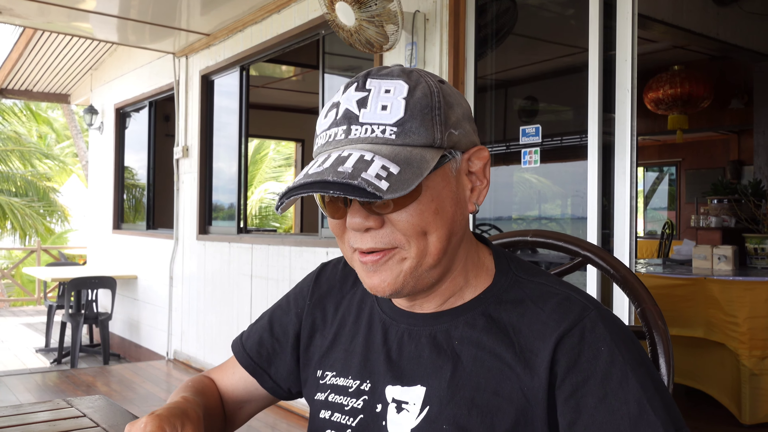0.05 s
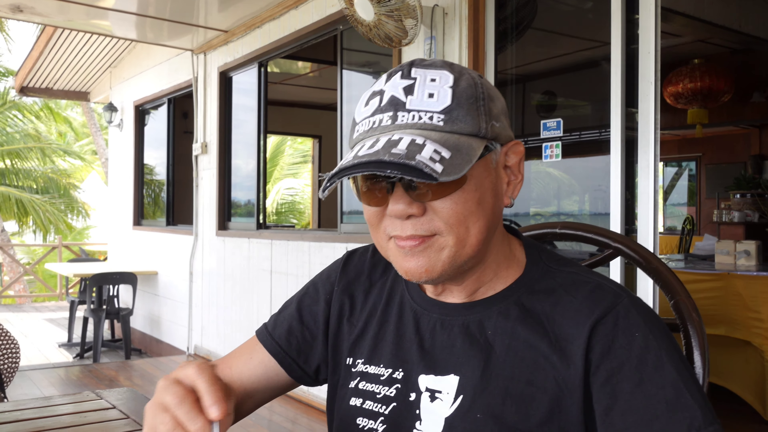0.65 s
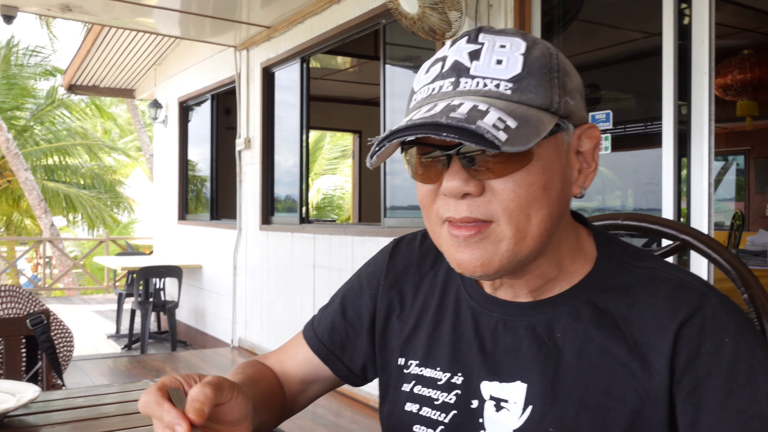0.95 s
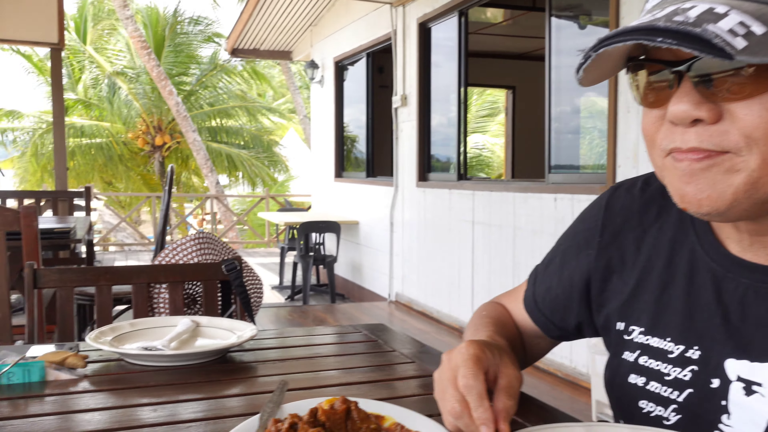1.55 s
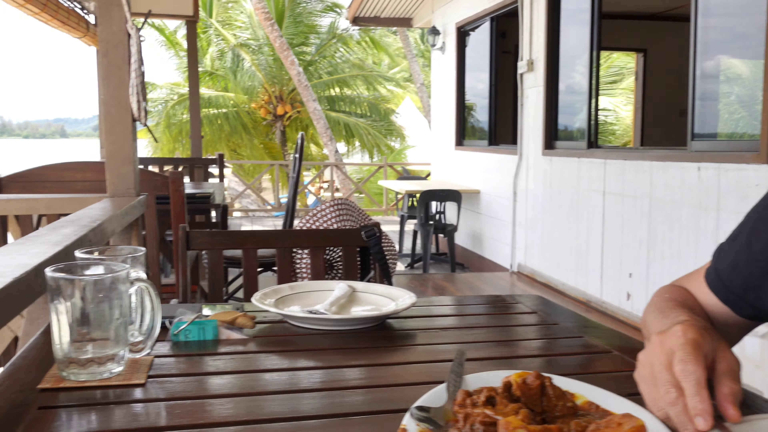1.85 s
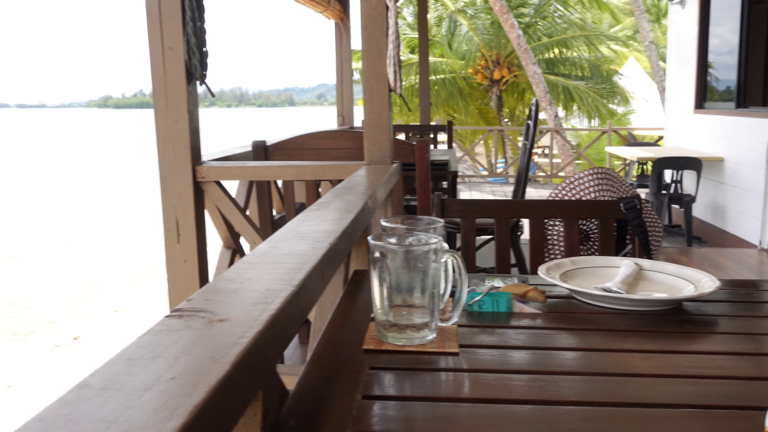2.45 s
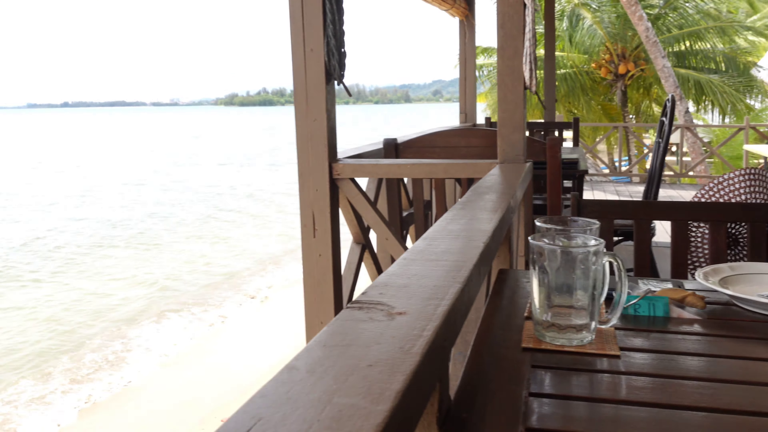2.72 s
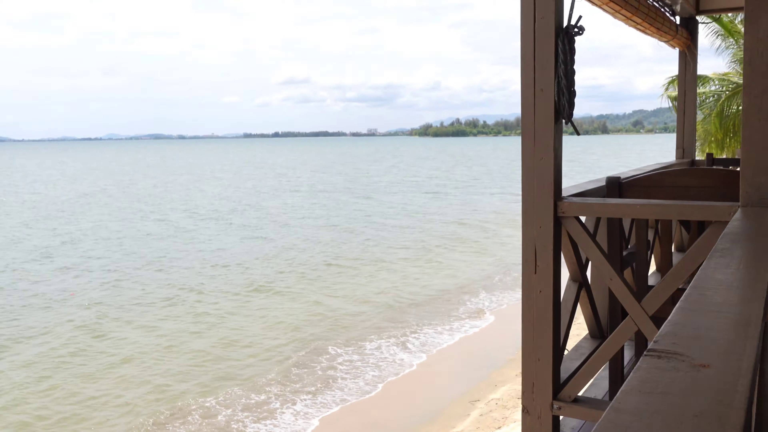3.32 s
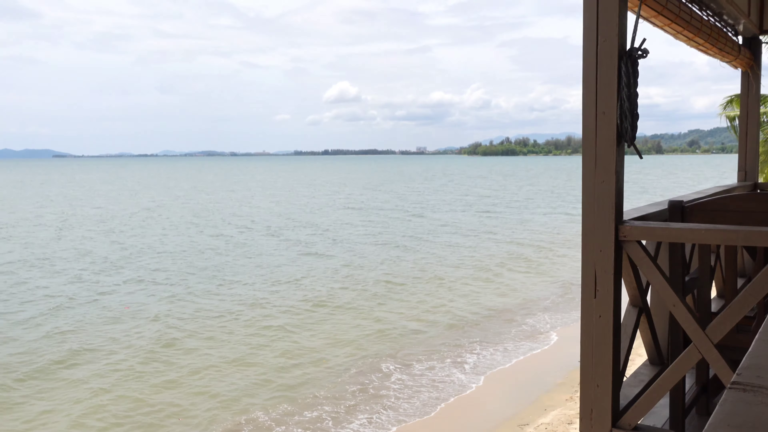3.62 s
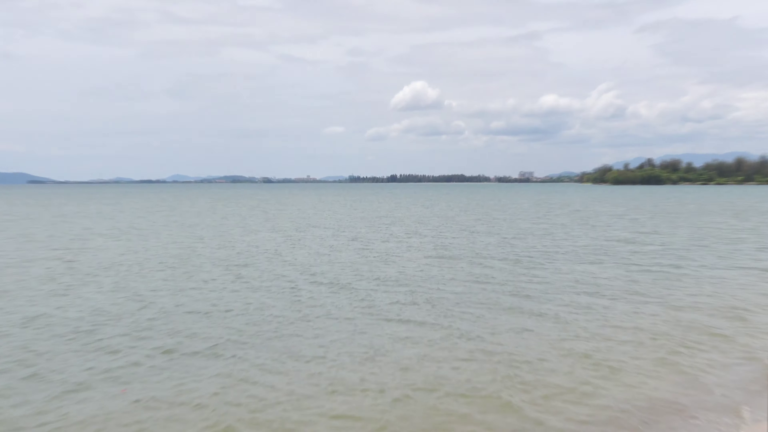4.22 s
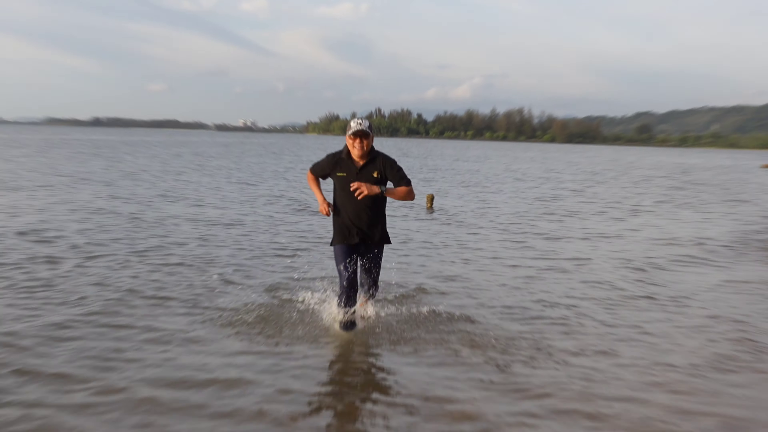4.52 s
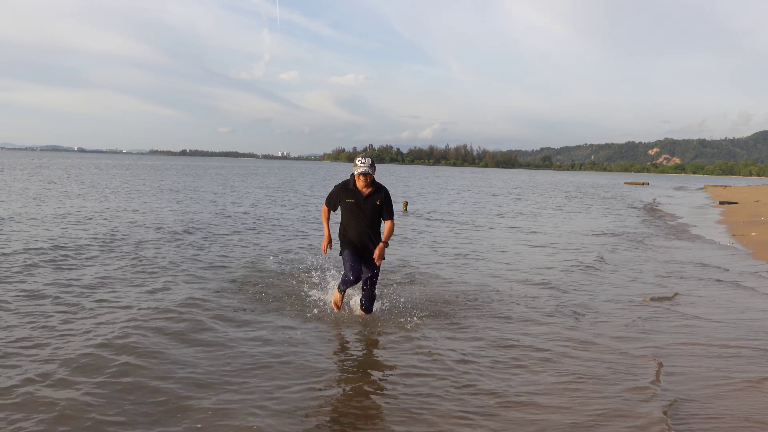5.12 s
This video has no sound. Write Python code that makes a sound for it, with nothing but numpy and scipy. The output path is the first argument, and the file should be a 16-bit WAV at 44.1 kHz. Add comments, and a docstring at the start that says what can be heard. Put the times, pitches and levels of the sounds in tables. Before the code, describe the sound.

Small waves rush onto sand while cutlery clinks on a plate, then someone runs splashing through shallow water.

```python
"""A seaside veranda: small waves break and wash up the sand below, a rush of countless bubbles,
while a spoon and a fork tap a plate and all three ring. The microphone turns from table to sea.
This fades out and the water's edge fades in, where someone runs through the shallows.
Each stride throws up spray, drops tick as they land, and trapped bubbles ring.
A faint rumble of sea and breeze lies under both scenes."""
import sys
import numpy as np
from scipy import signal
from scipy.fft import rfft, irfft, next_fast_len
from scipy.io import wavfile

SR = 44100
rng = np.random.default_rng(int(sys.argv[2]) if len(sys.argv) > 2 else 0)


def to_wav(sig):
    """Store sig (one row per channel, or 1-D mono) as 16-bit WAV at the path in sys.argv[1].

    Samples outside -1..1 are clipped; the rate is SR.
    """
    pcm = np.clip(np.atleast_2d(sig), -1, 1) * 32767
    pcm = np.round(pcm).astype(np.int16)
    wavfile.write(sys.argv[1], SR, pcm.T)  # frames by channels


N = 236876
TIME = np.arange(N) / SR
SCENE_CHANGE_S = 4.425

# waves on the sand: break_s, strength_db, build_db_per_s, retreat_s (to drop the first 10 dB)
WAVES = [(2.029, -29.5, 5, 0.72), (3.245, -38.8, 45, 1.24)]
# little waves that topple along the way: start_s, lift_db
WAVELETS = [(0.02, 5.5), (0.6, 4.5), (1.2, 4), (1.44, 0), (2.08, 1), (3.07, 4), (3.235, 2), (3.48, 3),
            (3.775, 6)]
# the surf's gurgle, wash, hiss and fizz: usual_db, db_per_db_of_swell, wavelet_share, max_fall_db_per_s
SURF_PARTS = [(-53, 1.23, 1.0, 40), (-35, 1.0, 0.46, 30), (-36, 0.98, 0.18, 15), (-45.0, 0.94, 0.087, 10.5)]
# tone of the surf when facing the table, then the sea: pitch_hz, level_db
SURF_FACING_TABLE = [(15, -73), (25, -47), (64, -41.5), (127, -28), (180, -16), (217, -11.5), (301, -6.5),
                     (427, -4.5), (695, 0), (1260, 0), (2000, -2.5), (6050, -12), (11900, -25),
                     (16000, -37.5)]
SURF_FACING_SEA = [(15, -72), (25, -42), (87, -28), (157, -17), (242, -12.5), (451, -6), (489, -4),
                   (887, 1.5), (1020, -1.5), (1480, -1), (2000, -4), (3340, -6), (7510, -17.5),
                   (14800, -32), (16000, -37)]
# how alike left and right are in the surf (1 = the same): pitch_hz, likeness
SURF_LIKENESS = [(60, 0.67), (150, 0.97), (380, 0.98), (950, 0.84), (2380, 0.68), (5980, 0.65),
                 (15000, 0.41)]
# the notes that plate, spoon and fork ring with: pitch_hz, level_db, ring_s (to fade by 60 dB)
PLATE_NOTES = [(1603, -21.5, 0.34), (2325, -7.5, 0.087), (2428, -8.5, 0.092), (2572, 0, 0.03),
               (3668, -5, 0.039), (4980, -4.5, 0.078), (5150, -7.5, 0.044), (8140, -9.5, 0.11),
               (11000, -23, .1)]
SPOON_NOTES = [(1574, -11, 0.37), (2526, -14, 0.09), (3633, -0.5, 0.12), (3700, 4, 0.029),
               (4660, -10, 0.23), (5030, -10, .2), (5940, -17, 0.24), (6113, -15, .14), (6330, -14.5, 0.48),
               (7355, -10, 0.36), (7980, -11, 0.29), (8120, -13, 0.23), (9146, -19.5, .13),
               (9880, -5.5, 0.11), (11770, -17, 0.23), (13150, -21, .16), (13975, -21.5, .17)]
FORK_NOTES = [(3608, -1, 0.061), (3684, -2, 0.11), (5933, 1, 0.12), (6440, -5.5, 0.3), (7600, -14.5, .18),
              (7760, -11.5, .19), (7935, -1, .12), (9540, -9.5, 0.2), (9835, -17, .2), (12100, -17.5, .22),
              (14010, -21, .18)]
# cutlery touching the plate: start_s, plate_db, spoon_db, fork_db, top_hz (higher notes ring weakly)
CLINKS = [(.0942, -30, -52, -56, 3500), (.1082, -27, -31, -35, 4830), (.1396, -21.5, -36, -49, 3400),
          (.150, -25, -55, -48, 5200), (0.1962, -26, -38, -51, 3400), (0.212, -30.5, -52, -55, 6500),
          (1.0877, -28, -16.5, -47, 15500), (1.1215, -21, -25.5, -34, 7000), (1.159, -26, -42, -50, 4500),
          (1.2403, -25, -50, -47, 4000), (1.489, -18, -50, -51, 6500), (1.622, -34, -35, -52, 4000),
          (1.7579, -17, -25, -23, 13500)]
# change from one bounce to the next: plate_db, spoon_db, fork_db
BOUNCE_DB = [-8.5, -7.5, -1.5]
# feet plunging into the water: start_s, level_db, fade_s
STRIDES = [(4.826, -44.5, 0.56), (5.022, -45, 0.15), (5.262, -31, 0.084), (5.279, -33.5, 0.22)]
# gurgle, wash, hiss and fizz of the shallows: lapping_db, churned_db
SHALLOWS_PARTS = [(-70, -58.5), (-51.5, -41.5), (-54, -44), (-63.5, -51)]
# tone of the shallows: pitch_hz, level_db
SHALLOWS_TONE = [(15, -73), (25, -41), (270, -14.5), (317, -14.5), (384, -17), (416, -13), (659, -4),
                 (1370, -3), (3080, -0.5), (8140, -10), (14000, -25.5), (16000, -41)]
# how alike left and right are in the shallows: pitch_hz, likeness
SHALLOWS_LIKENESS = [(60, 0.97), (240, 1), (950, 0.9), (3770, 0.96), (15000, 0.78)]
# the loudest single drops and bubbles: start_s, level_db, pitch_hz, cycles_until_gone
PLOPS = [(3.238, -24, 1390, 42), (3.778, -23.5, 1390, 42), (4.645, -30.5, 773, 24), (4.730, -35.5, 920, 40),
         (4.866, -16, 8900, 15), (4.879, -17, 4370, 18), (4.9539, -13.5, 3050, 11),
         (4.957, -27.5, 1058, 24), (4.9995, -14.5, 3060, 15), (5.175, -6.5, 4970, 9.6),
         (5.263, -14, 3500, 25), (5.2676, -12, 3920, 17), (5.2765, -9.5, 930, 8.8),
         (5.2777, -11.5, 2280, 16), (5.312, -18, 1130, 15), (5.335, -22.5, 1660, 34),
         (5.343, -33, 4050, 190), (5.356, -27, 4320, 300)]
# deep rumble of the open air: time_s, level_db
RUMBLE_LEVELS = [(0, -88), (1.2, -85), (2.6, -75), (3.75, -80), (4.2, -66), (4.6, -92), (5.37, -87)]


def surf(usual_db=-35, turn_s=(2.3, 3.5)):
    """Waves rush and gurgle, deeper when stronger; the tone shifts as the microphone turns to the sea."""
    gurgle = bubbles(per_s=700, cycles=29, low_hz=279.3, high_hz=2022, spread_db=3.5, pitches=24)
    fizzing = rush(SURF_LIKENESS, patchy_db=1.0, flicker_hz=14) + from_db(-16.5) * gurgle
    swell, lift = wave_strength() - usual_db, wavelets()
    levels = [db + follows * foam(swell, fall) + share * lift for db, follows, share, fall in SURF_PARTS]
    turned = np.interp(TIME, turn_s, [0, 1])
    facing_table = water(fizzing, SURF_FACING_TABLE, levels)
    facing_sea = water(fizzing, SURF_FACING_SEA, levels)
    return (1 - turned) * facing_table + turned * facing_sea


def wave_strength(lull_db=-44):
    """Each wave builds, breaks and retreats ever faster into a steady lull; gives dB."""
    power = from_db(lull_db) ** 2
    for break_s, db, build, retreat_s in WAVES:
        building_db = build * np.maximum(break_s - TIME, 0)
        retreating_db = 10 * (np.maximum(TIME - break_s, 0) / retreat_s) ** 2
        power = power + from_db(db - building_db - retreating_db) ** 2
    return 10 * np.log10(power)


def wavelets(topple_s=0.01, settle_s=0.16):
    """Each little wave lifts the surf for a moment as it topples; gives dB."""
    return sum(db * np.clip((TIME - start_s) / topple_s, 0, 1) * np.exp(-abs(TIME - start_s) / settle_s)
               for start_s, db in WAVELETS)


def foam(level_db, db_per_s):
    """Foam goes on bursting behind a wave, so the level falls no faster than the given rate."""
    return np.maximum.accumulate(level_db + db_per_s * TIME) - db_per_s * TIME


def tableware(crack_db=-6, crack_s=0.1, uneven_db=1.2, free_s=0.031, damped_s=0.085):
    """Each touch gives a gritty crack and sets plate, spoon and fork ringing."""
    out, t = np.zeros((2, N)), TIME[:SR // 3]
    notes = np.array(PLATE_NOTES + SPOON_NOTES + FORK_NOTES)
    owner = np.repeat(np.arange(3), [len(PLATE_NOTES), len(SPOON_NOTES), len(FORK_NOTES)])
    hz, note_db, ring_s = notes.T[:, :, None]
    sides = np.array([1, -1])[:, None, None]
    tilt_db, lag = rng.normal(size=(2, len(notes), 1))   # each note spreads left and right its own way
    phase = 2 * np.pi * (hz * t + rng.random((len(notes), 1))) + 0.12 * sides * lag
    rings = from_db(note_db + sides * (tilt_db - 3.0) / 2) * dying(t, ring_s) * np.sin(phase)
    rings *= dying(np.maximum(t - free_s, 0), damped_s)   # the fingers soon touch and stop the ringing
    for start_s, levels, top_hz in touches():
        softness = 1 / np.sqrt(1 + (hz[:, 0] / top_hz) ** 6)   # a glancing touch misses the high notes
        strength = softness * from_db(levels[owner] + uneven_db * rng.normal(size=len(notes)))
        grit = rng.standard_normal(len(t)) + .5 * rng.standard_normal((2, len(t)))
        crack_band_hz = [1800, np.clip(0.62 * top_hz, 2800, 13500)]
        crack = filtered(grit * dying(t, crack_s), 1, crack_band_hz, "band")
        add(out, start_s, strength @ rings + from_db(max(levels) + crack_db) * crack)
    return filtered(out, 4, 1300, "high")   # small things give off no bass


def touches(bounce_s=0.008):
    """The cutlery lands and bounces twice, weaker each time."""
    for start_s, *levels, top_hz in CLINKS:
        gap_s = bounce_s * (1 + .06 * rng.normal())
        for bounce in range(3):
            yield start_s + bounce * gap_s, np.array(levels) + bounce * np.array(BOUNCE_DB), top_hz


def shallows(churn_s=(4.675, 5.01)):
    """A runner churns up lapping water: falling spray patters, and each stride adds a burst of it."""
    drops = bubbles(per_s=1400, cycles=14, low_hz=450, high_hz=13100, spread_db=2.5, pitches=36)
    spray = rush(SHALLOWS_LIKENESS, patchy_db=3.0, flicker_hz=28) + from_db(-5.5) * drops
    levels = [np.interp(TIME, churn_s, part) for part in SHALLOWS_PARTS]
    bursts = sum(from_db(db) * dying(TIME - start_s, fade_s) for start_s, db, fade_s in STRIDES)
    splash = unit_level(shaped(spray, lambda hz: from_db(at_hz(SHALLOWS_TONE, hz))))
    return panned(water(spray, SHALLOWS_TONE, levels) + bursts * splash, left_db=-1.1)


def plops(rise=0.13, tick_db=-14, tick_cycles=8):
    """A drop lands with a tick; the bubble it traps rings and climbs in pitch as it nears the surface."""
    out, t = np.zeros((2, N)), TIME[:SR // 8]
    for start_s, db, hz, cycles in PLOPS:
        life_s = cycles / hz
        phase = 2 * np.pi * hz * t * (1 + .5 * rise * np.minimum(t / life_s, 2))
        bubble = (1 - np.exp(-t * hz)) * dying(t, life_s) * np.sin(phase)
        noise = filtered(rng.standard_normal(len(t)), 2, [.5 * hz, min(2 * hz, 11000)], "band")
        tick = unit_level(noise) * dying(t, tick_cycles / hz)
        plop = from_db(db) * (bubble + from_db(tick_db) * tick)
        add(out, start_s, panned(plop, left_db=1.7 * rng.normal() - 1))
    return filtered(out, 2, [300, 10000], "band")


def water(source, tone, levels_db):
    """Big air pockets gurgle, middling ones wash, small ones hiss and the finest fizz."""
    sound = shaped(source, lambda hz: from_db(at_hz(tone, hz)))
    below = [shaped(sound, lambda hz: 1 / (1 + (hz / edge_hz) ** 6)) for edge_hz in (400, 2000, 6000)]
    parts = np.diff([0 * sound, *below, sound], axis=0)
    return sum(unit_level(part) * from_db(db) for part, db in zip(parts, levels_db))


def bubbles(per_s, cycles, low_hz, high_hz, spread_db, pitches, uneven_db=3.0):
    """Nearby bubbles of uneven size ring briefly; each pitch has its own place from left to right."""
    out = 0
    for hz in np.geomspace(low_hz, high_hz, pitches):
        when, size, sign = rng.random((int(per_s * N / SR / pitches) + 1, 3)).T
        heights = from_db(uneven_db * np.minimum(-np.log(1 - size), 4.5))   # many weak, a few strong
        clicks = np.zeros(N)
        clicks[(when * N).astype(int)] = heights * np.sign(sign - .5)
        ringing = np.sqrt(hz) * unit_level(ring(clicks, hz, cycles / hz))
        out = out + panned(ringing, spread_db * rng.normal())
    return unit_level(out)


def rush(likeness, patchy_db, flicker_hz):
    """Countless far bubbles merge into a hiss whose level flickers in patches of pitch."""
    out, shared_drift = 0, drift(rate_hz=6)
    edges_hz, size = np.geomspace(20, 18000, 18), next_fast_len(N)
    middle, side = rfft(rng.standard_normal((2, size)))
    hz = np.fft.rfftfreq(size, 1 / SR)
    alike = np.clip(at_hz(likeness, hz + 1), 0, .99)
    stereo = np.sqrt(1 + alike) * middle + np.sqrt(1 - alike) * side * [[1], [-1]]
    for low, high in zip(edges_hz, edges_hz[1:]):
        band = irfft(stereo * ((hz >= low) & (hz < high)), size)[:, :N]
        out = out + band * from_db(patchy_db * (.5 * shared_drift + drift(flicker_hz)))
    return unit_level(out)


def veranda(sound, echo_db=-9.0, fade_s=0.43, delay_s=.004):
    """Table, wall and roof send back a short scatter of echoes."""
    t = TIME[:SR // 3]
    echoes = rng.standard_normal((2, len(t))) * dying(t - delay_s, fade_s)
    echoes /= np.sqrt(np.sum(echoes ** 2, axis=1, keepdims=True))
    return sound + from_db(echo_db) * signal.fftconvolve(sound, echoes, axes=1)[:, :N]


def rumble(low_hz=65, high_hz=125):
    """Sea and breeze make a faint, deep noise."""
    noise = rng.standard_normal(N) + 0.6 * rng.standard_normal((2, N))
    deep = shaped(noise, lambda hz: 1 / np.sqrt((1 + (low_hz / hz) ** 6) * (1 + (hz / high_hz) ** 8)))
    return unit_level(deep) * from_db(np.interp(TIME, *np.transpose(RUMBLE_LEVELS)))


def drift(rate_hz):
    """A smooth random wander, about 1 in size."""
    step, warm_up = 40, 2000
    keep = np.exp(-2 * np.pi * step * rate_hz / SR)
    noise = rng.standard_normal(N // step + warm_up + 2)
    slow = signal.lfilter([1], [1, -2 * keep, keep * keep], noise)[warm_up:]
    return np.interp(np.arange(N) / step, np.arange(len(slow)), unit_level(slow))


def ring(clicks, hz, fade_s):
    """Each click starts a pure tone that dies away."""
    keep, angle = np.exp(-np.log(1000) / (fade_s * SR)), 2 * np.pi * hz / SR
    return signal.lfilter([0, np.sin(angle)], [1, -2 * keep * np.cos(angle), keep ** 2], clicks + 1e-18)


def dying(t, fade_s):
    """Starts at t = 0 and falls by 60 dB every fade_s."""
    return (t >= 0) * np.exp(-np.log(1000) * np.clip(t / fade_s, 0, 10))


def shaped(sound, gain):
    """Turn each pitch up or down by gain(hz)."""
    size = next_fast_len(N + 4096)
    hz = np.maximum(np.fft.rfftfreq(size, 1 / SR), 1)
    return irfft(rfft(sound, size) * gain(hz), size)[..., :N]


def filtered(sound, steepness, hz, kind):
    """Keep a band of pitches, or the high ones."""
    return signal.sosfilt(signal.butter(steepness, hz, kind, fs=SR, output="sos"), sound + 1e-18)


def at_hz(table, hz):
    """Read between a table's rows at any pitch."""
    pitches, values = np.transpose(table)
    return np.interp(np.log(hz), np.log(pitches), values)


def panned(sound, left_db):
    """Make the left side left_db louder than the right."""
    return sound * from_db([[left_db / 2], [-left_db / 2]])


def add(out, start_s, sound):
    """Mix in a short sound."""
    i = int(start_s * SR)
    out[..., i:i + sound.shape[-1]] += sound[..., :N - i]


def from_db(db):
    """Turn decibels into a multiplier."""
    return 10 ** (np.asarray(db) / 20)


def unit_level(sound):
    """Scale to an average power of 1."""
    return sound / np.sqrt(np.mean(sound ** 2) + 1e-20)


def scene(fade_out_s=0.66, fade_in_s=0.15):
    """The veranda fades to silence, then the shallows fade in."""
    fade_out = np.clip((SCENE_CHANGE_S - TIME) / fade_out_s, 0, 1)
    fade_in = np.clip((TIME - SCENE_CHANGE_S) / fade_in_s, 0, 1)
    at_table = surf() + veranda(tableware())
    return fade_out * at_table + fade_in * shallows() + (fade_out + fade_in) * rumble() + plops()


def record(dry):
    """The highest treble, above 15900 Hz, is cut steeply."""
    return shaped(dry, lambda hz: 1 / np.sqrt(1 + (hz / 15900) ** 400))


dry = scene()
out = record(dry)
to_wav(out)
```